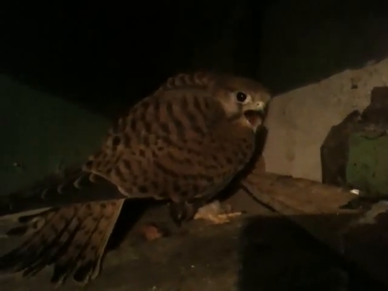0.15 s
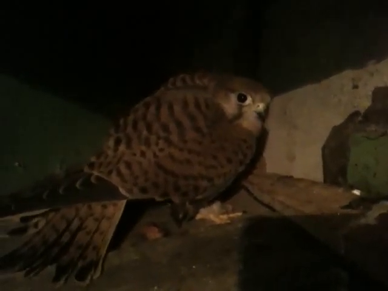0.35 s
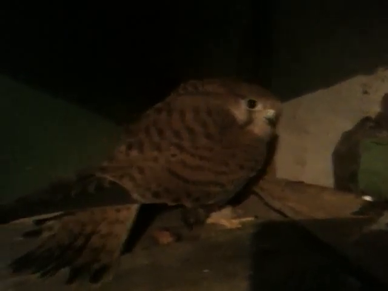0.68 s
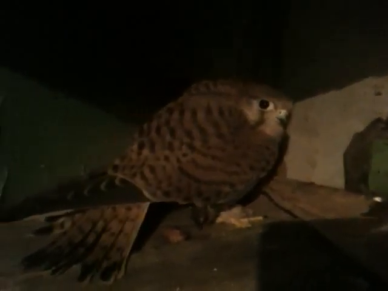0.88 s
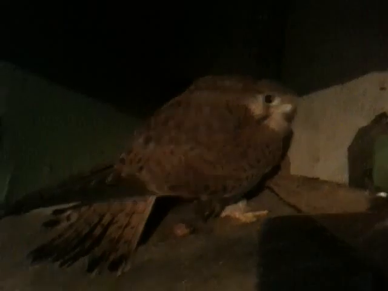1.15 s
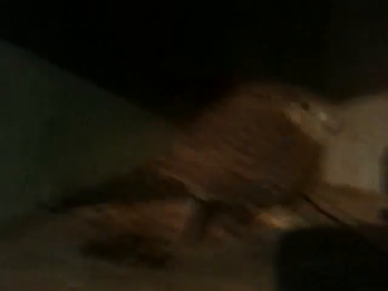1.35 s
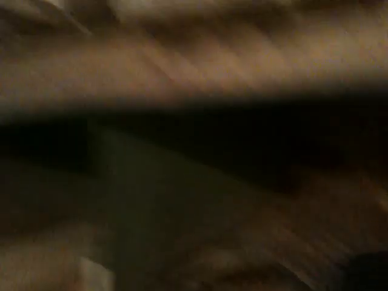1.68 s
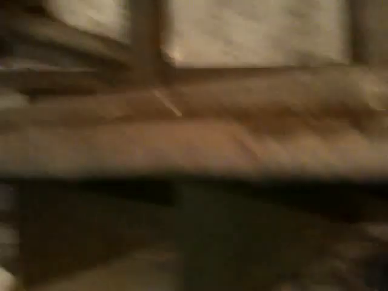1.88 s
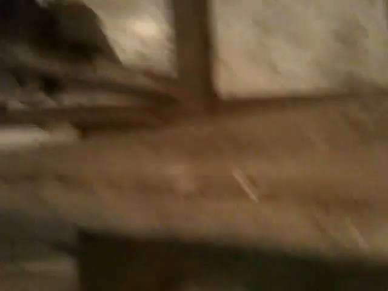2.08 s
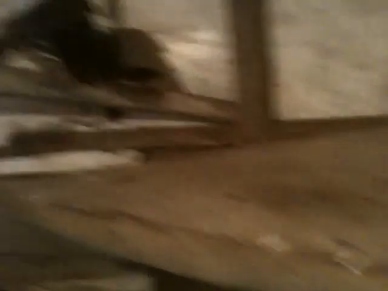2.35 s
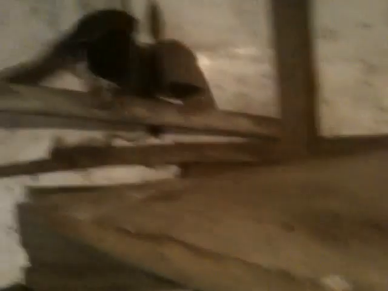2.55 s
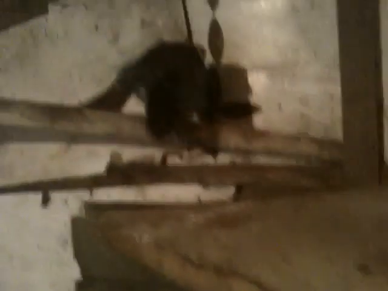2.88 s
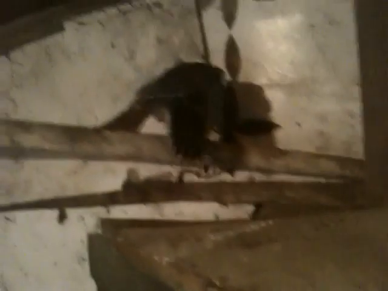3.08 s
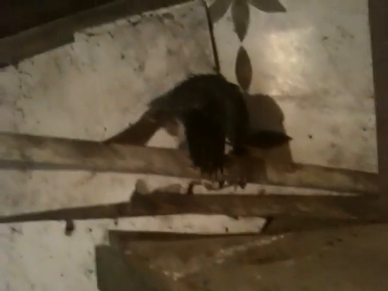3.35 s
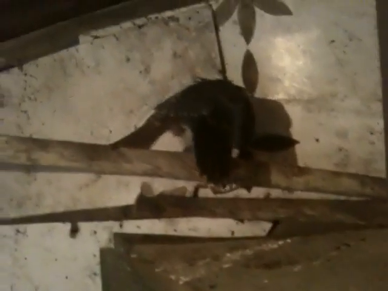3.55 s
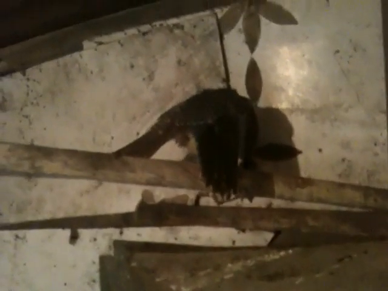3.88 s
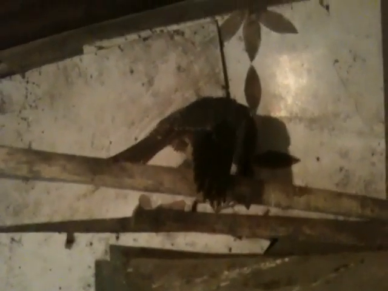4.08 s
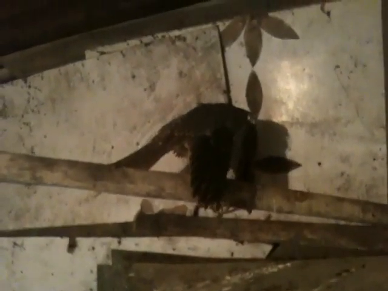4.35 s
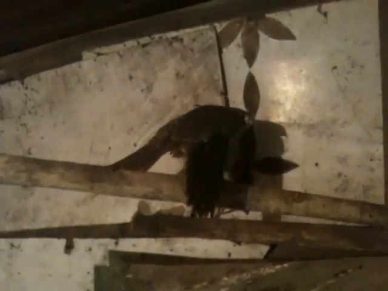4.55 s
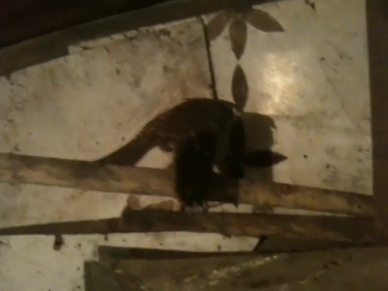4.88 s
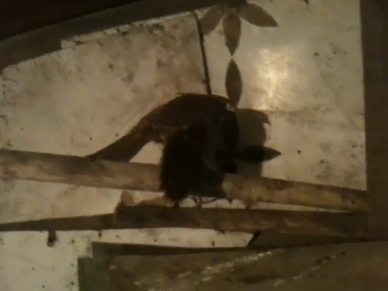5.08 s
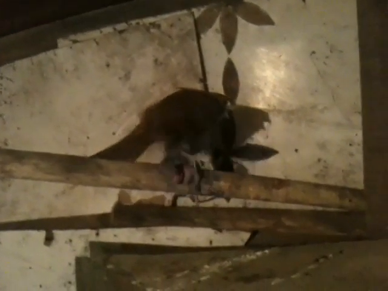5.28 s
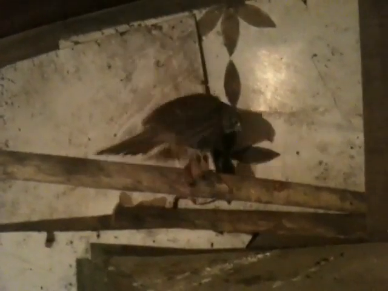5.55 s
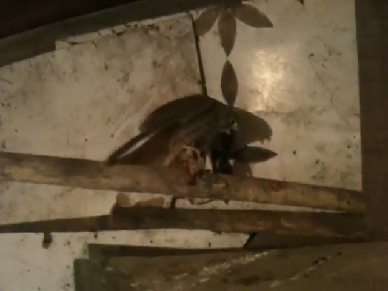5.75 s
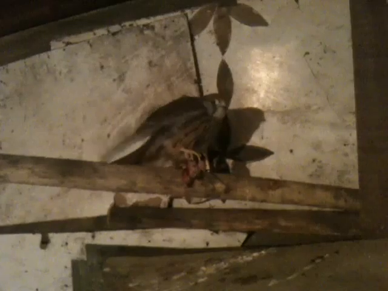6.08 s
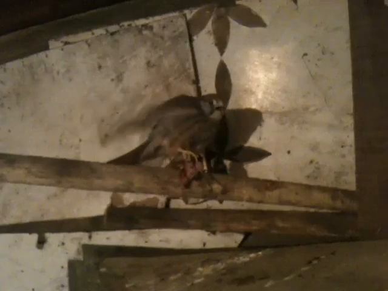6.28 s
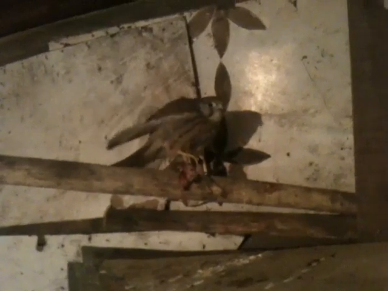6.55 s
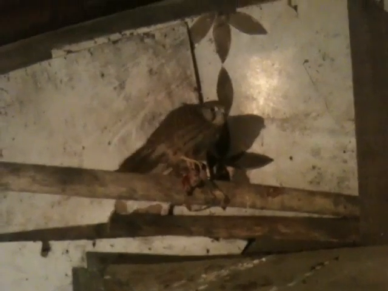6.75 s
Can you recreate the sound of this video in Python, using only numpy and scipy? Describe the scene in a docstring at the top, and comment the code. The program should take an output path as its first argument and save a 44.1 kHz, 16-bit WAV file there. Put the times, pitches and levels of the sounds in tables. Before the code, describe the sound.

Two small falcons call indoors at close range. The higher voice opens, overlapping a softer, lower one; the lower then keeps up a steady run of shrill, fast-throbbing trills, three of the early ones led by thin squeaks. The higher bird interrupts until the middle, then leaves the other alone. Tiny beak ticks, tight short reverberation, steady faint hiss and slight overload on the strongest notes.

```python
"""In a small wooden loft two kestrels call: trills whose pitch and strength throb fifteen times a second.
One on a perch calls over and over, three times after a thin squeak; a higher one, first close by, cuts in four times.
Each voice is a stack of harmonics with a resonant second, frayed by noise and heard straight and as echoes.
The loudest throbs overload the microphone. A few sharp ticks, hiss and faint far whistles lie beneath."""
import sys
import numpy as np
from scipy import signal
from scipy.fft import rfft, irfft, next_fast_len
from scipy.io import wavfile

SR = 44100
rng = np.random.default_rng(int(sys.argv[2]) if len(sys.argv) > 2 else 0)


def output_pcm(signal):
    """Save a mono or channel-first signal as 16-bit PCM at the path in sys.argv[1].

    Samples are clipped to [-1, 1] before scaling.
    """
    pcm = np.clip(np.atleast_2d(signal).T, -1, 1) * 32767
    wavfile.write(sys.argv[1], SR, np.round(pcm).astype(np.int16))


N = 304819

# Trills of each bird, one a row, before the straight and echo gains: (start [s], last crest [s], throb length [s],
# pitch at the last crest [Hz], climb to it [Hz], arch of pitch midway [Hz], level at the last crest [dB],
# swell to it [dB], arch of level midway [dB], ring of the second harmonic at the last crest [dB],
# pitch sag between crests [0-1])
PERCHED_TRILLS = [ (0.295, 0.533, 0.069, 1845, 79.3, -18.5, -18, 0.5, -0.1, -2, .09),
                  (0.677, 1.044, 0.065, 1892, 152.7, -14, -18, 6.5, 2.5, -2, 0.12),
                  (1.177, 1.545, 0.067, 1959, 196, 31.5, -16.5, 6.5, 3, 4.5, 0.14),
                  (1.712, 2.057, 0.064, 1979, 217, 11, -12.5, 10, 5.5, 1.5, 0.14),
                  (2.215, 2.509, 0.067, 1972, 226, 28.5, -10.5, 10.5, 0.5, 4.5, .12),
                  (2.670, 3.027, 0.063, 2042, 212.4, -4, -12.5, 9.5, 3, 7.5, 0.11),
                  (3.192, 3.498, 0.067, 1995, 221.5, 83.5, -10.5, 12, 5.5, 3.5, 0.09),
                  (3.643, 3.955, .065, 1997, 191.4, 23.5, -12, 7.5, 1, 6.5, .105),
                  (4.115, 4.413, .062, 1992, 109.7, 0.5, -11, 6.5, 0.5, 9, .105),
                  (4.63, 4.9, 0.064, 1962, 146.4, 29, -12.5, 5.5, 1, 6, .1),
                  (5.065, 5.424, 0.061, 2049, 153.6, 33, -13.5, 4.5, 4.5, 8.5, 0.07),
                  (5.708, 6.064, 0.067, 2030, 94.7, 83.5, -12.5, 4.5, 2.5, 3.5, .08),
                  (6.258, 6.554, 0.065, 2057, 164, 2.5, -11.5, 8, 2, 6, .1)]
HIGHER_TRILLS = [ (-.040, .266, .0665, 2256, 258.4, 65, -14.5, 1, 0.18, 17.5, 0.072),
                 (1.985, 2.213, .064, 2227, 34.5, -35, -17.5, 0, -1.8, 1.5, .085),
                 (2.550, 2.840, .063, 2318, 212.3, 50.5, -16.5, -0.5, -0.6, 5.4, 0.077),
                 (3.395, 3.630, .066, 2243, 65.2, 25, -14, 0.5, -0.38, 3.1, 0.071)]
# Harmonics of each voice, from the fundamental up: (level at a crest [dB], further level between crests [dB])
PERCHED_VOICE = [(-8, -10), (1, -10.5), (1.5, -7.5), (-5.5, -4), (-4.5, -10.5), (-13.5, -2.5),
                 (-13.5, -7.5), (-21.5, -1), (-17.5, -13.5)]
HIGHER_VOICE = [(1.5, -8), (0, -6), (1, -3.5), (-2, -5.5), (-8.5, 1), (-12.5, 2), (-11, -4), (-23.5, -5)]
# Thin squeaks with which the perched bird leads into a trill: (start [s], length [s], top pitch [Hz], level [dB])
SQUEAKS = [(0.676, 0.063, 3580, -21.5), (1.18, .045, 3530, -32), (1.684, 0.043, 3840, -24)]
# Strength of the straight path as the microphone is carried from one bird to the other:
# (time [s], perched level [dB], higher level [dB])
FACING = [(0, 3, -1.5), (.35, -5.5, 5.5), (1.5, -5.5, 3), (2.0, -3, 5.5), (2.5, .5, 2.5), (3.5, 0, -6),
          (6.9, -3.5, -7)]
# Sharp ticks, most as the beak opens for a trill: (time [s], level before the trim [dB])
TICKS = [(1.184, -26), (1.72, -10), (3.197, -19), (4.12, -21.5), (4.606, -20), (4.636, -30), (5.07, -19),
         (5.71, -24.5), (6.26, -20.5), (6.825, -49)]
# Faint gliding whistles: (start [s], end [s], first pitch [Hz], last pitch [Hz], arch midway [Hz], level [dB])
WHISTLES = [(0.552, 1.298, 1304, 1270, -19.5, -62), (1.701, 2.502, 1362, 1059, 40.5, -52),
            (4.2, 4.643, 1237, 1067, 89.5, -58.5), (5.446, 6.097, 1285, 1319, 47, -57.5),
            (6.391, 6.797, 975, 1130, 10, -61.5)]
# Relative spectra of air through the beak, the ticks, the steady hiss and the overload: (frequency [Hz], level [dB])
BREATH_COLOUR = [(1500, -22), (2700, 0.5), (3400, 13), (5500, 19), (7500, -34.5), (11000, -10),
                 (16000, -12)]
TICK_COLOUR = [(200, -73.5), (1500, 5.5), (2400, -6.5), (3200, 23), (5000, 10), (7500, 4), (12000, -2),
               (16000, -22)]
HISS_COLOUR = [(30, -63), (80, -32), (160, -14), (400, -9), (1200, -8.5), (2400, -12.5), (3500, -17.5),
               (5000, -4.5), (6700, 4), (8200, -7.5), (10000, -27), (16000, -27)]
CRACKLE_COLOUR = [(30, -20), (70, -19), (160, -30), (350, -7), (500, 14.5), (750, -33.5), (1300, -3),
                  (2800, 10.5), (8000, -17.5), (16000, -26)]
# Straight path; treble is beamed from the beak, so little of it goes this way: (frequency [Hz], gain [dB])
BEAM = [(2000, -3), (4200, 1), (6000, 0), (8000, -4.5), (12000, -6), (16000, -7)]
# Decay of the loft: (frequency [Hz], time to fall by 60 dB [s])
LOFT_DECAY = [(300, 0.17), (2000, 0.19), (4000, 0.2), (6000, 0.15), (10000, 0.14), (16000, 0.088)]

HISS_DB = -46  # rms
EDGE_HZ = 17000  # upper band limit
SLOW_START_S = 0.005  # the first crest is moved this much earlier, which lengthens the first throb
EARLIEST_S = 0.01  # least delay from the start to the first crest, before that move
FALL_S, FALL_SHARE, FALL_DB = 0.042, 0.1423, 10.5  # pitch and level drop after the last crest
UNEVEN_DB, UNEVEN_HZ = 0.5, 10  # random spread from crest to crest
RING_GROWTH_DB = 7  # growth of the ring from first crest to last
ATTACK_DB = 15.5  # rise of level into the first crest


def amp(db):
    """Converts a level in decibels to an amplitude ratio."""
    return 10 ** (np.asarray(db) / 20)


def unit(x):
    """Normalises a signal to rms 1."""
    return x / np.sqrt(np.mean(x ** 2) + 1e-20)


def read(points, hz):
    """Interpolates a spectrum linearly on a logarithmic frequency axis."""
    f, value = np.transpose(points)
    return np.interp(np.log(hz + 1), np.log(f), value)


def add(mix, start, sound):
    """Superposes a sound on the mix at a time in seconds, cut at both ends of the mix."""
    at = round(start * SR)
    sound = sound[max(-at, 0):]
    part = mix[max(at, 0):][:len(sound)]
    part += sound[:len(part)]


def coloured(x, colour):
    """Linear filtering: multiplies the spectrum of a signal by a gain curve."""
    size = next_fast_len(len(x))
    gain = amp(read(colour, np.fft.rfftfreq(size, 1 / SR)))
    return irfft(rfft(x, size) * gain, size)[:len(x)]


def noise(colour, size):
    """Gaussian noise shaped by a spectrum and normalised to rms 1."""
    return unit(coloured(rng.standard_normal(size), colour))


def wander(hz, size, order=5):
    """Low-passed noise: a random drift of rms 1, mostly slower than hz."""
    low_pass = signal.butter(order, hz, fs=SR, output="sos")
    return unit(signal.sosfilt(low_pass, rng.standard_normal(SR)))[-size:]


def hiss():
    """Stationary noise: a steady background of fixed spectrum and level."""
    return amp(HISS_DB) * noise(HISS_COLOUR, size=N)


def gesture(call):
    """Slow modulation: pitch and level climb from crest to crest, then fall."""
    start, last, throb_s, top_hz, climb_hz, arch_hz, top_db, swell_db, arch_db, ring_db, sag = call
    t = np.arange(start, last + FALL_S, 1 / SR)
    crests = np.arange(last, start + EARLIEST_S, -throb_s)[::-1].copy()
    crests[0] -= SLOW_START_S
    to_go = np.linspace(1, 0, len(crests))  # share of the trill still to come
    arch = np.sin(np.pi * to_go)
    chance = rng.standard_normal((len(crests), 2))
    crest_hz = top_hz - climb_hz * to_go + arch_hz * arch + UNEVEN_HZ * chance[:, 0]
    crest_db = top_db - swell_db * to_go + arch_db * arch + UNEVEN_DB * chance[:, 1]

    attack = np.interp(t, [start, crests[0]], [1, 0])
    release = np.clip((t - last) / FALL_S, 0, 1)
    throb = np.pi * np.interp(t, crests, np.arange(len(crests)))  # angle, a multiple of pi at each crest
    pitch = np.interp(t, crests, crest_hz) * (1 - FALL_SHARE * release ** 2)
    level_db = np.interp(t, crests, crest_db) - ATTACK_DB * attack - FALL_DB * release
    ring = np.interp(t, crests, ring_db - RING_GROWTH_DB * to_go)
    return t, throb, release, pitch, level_db, ring


def trill(call, voice, narrow, skew, lock, half, jitter, drift, rasp, air_db, strained_db,
          rasp_s=0.0632, jitter_hz=300, uneven=0.19, air_rise_db=3.0, air_hz=230, drain=0.28,
          scoop=0.14, scoop_s=0.014, chest_s=0.045, cling=0.11, shallow=0.2, purity=0.43,
          open_s=0.019, hoarse_db=-15, flicker_db=1.01, flicker_hz=110):
    """Harmonic synthesis: the syrinx sounds a harmonic stack that sags in pitch and strength between crests."""
    start, sag = call[0], call[-1]
    t, throb, release, pitch, level_db, ring_db = gesture(call)
    age = t - start

    throb = throb - skew * np.sin(throb) ** 2  # it tightens faster than it lets go
    slack = 1 - abs(np.cos(throb)) ** narrow  # 0 at a crest, 1 between
    strain = slack * (1 + cling * np.sin(2 * throb + np.pi))  # makes the ring come late and hang on
    ringing = 1 / (1 + abs(strain / lock) ** 5)  # the second harmonic snaps into the throat's resonance
    ring_db = ring_db * (1 - release ** 2)

    # the dips deepen through the call, no two alike
    depth = sag * (1 - shallow * (1 - age / age[-1]) + uneven * wander(12, len(t)))
    pitch = pitch * (1 - depth * slack)
    # pitch is roughest at the start, when slack and in the release
    unsteady = jitter * (1 + slack + release) + rasp * np.exp(-age / rasp_s)
    pitch = pitch * (1 + unsteady * wander(jitter_hz, len(t)) + drift * wander(86.7, len(t)))
    pitch = pitch * (1 - scoop * np.exp(-age / scoop_s))  # slides up into the note
    phase = 2 * np.pi * np.cumsum(pitch) / SR

    # the second harmonic speaks first, the fundamental last
    opening = 1 - np.exp(-(age / open_s) ** 2)
    chest = 1 - np.exp(-(age / chest_s) ** 2)
    # a partial at 3/2 of the pitch makes strong and weak cycles alternate
    out = half * amp(ring_db) * np.sin(3 * phase / 2)
    for k, (crest_db, slack_db) in enumerate(voice, 1):
        db = slack_db * slack
        swell = opening
        if k == 1:
            db = db - drain * ring_db  # a strong ring drains the fundamental
            swell = chest
        elif k == 2:
            db = ring_db * ringing + slack_db * (1 - ringing)
            swell = 1
        db = db + flicker_db * (k - 1) * wander(flicker_hz, len(t))  # harmonics above the first flicker
        out += swell * amp(crest_db + db) * np.sin(k * phase)
        # turbulence frays each line, more so for high harmonics
        blur = wander(air_hz, len(t)) * np.cos(k * phase) + wander(air_hz, len(t)) * np.sin(k * phase)
        out += swell * amp(crest_db + air_db + air_rise_db * k) * blur

    # air escapes wherever the tone is loose, least in a ringing call
    breath = amp(hoarse_db) * opening * np.exp(-age / rasp_s) + amp(strained_db) * (slack + release)
    out += breath * amp(-purity * ring_db) * noise(BREATH_COLOUR, size=len(t))
    edges = np.clip(age / 0.019, 0, 1) * np.clip((t[-1] - t) / 0.00072, 0, 1)
    return start, out * edges * amp(level_db)


def bird(calls, voice, **manner):
    """Superposition: all the trills of one bird share a voice and a manner."""
    out = np.zeros(N)
    for call in calls:
        add(out, *trill(call, voice, **manner))
    return out


def loft(x, gap_s=0.0017, build_s=0.0015):
    """Reverberation: dense echoes from the boards, each frequency band decaying at its own rate."""
    hz, t, bands = signal.stft(rng.standard_normal(SR // 2), SR, nperseg=256)
    decay = amp(-60 * t / read(LOFT_DECAY, hz)[:, None])
    tail = signal.istft(bands * decay, SR, nperseg=256)[1]
    tail = tail * np.clip((np.arange(len(tail)) / SR - gap_s) / build_s, 0, 1)
    return signal.fftconvolve(x, tail / np.linalg.norm(tail))[:N]


def whistles(waver=0.0093, ends_db=-7):
    """Frequency modulation: a thin far tone glides and wavers, loudest midway."""
    out = np.zeros(N)
    for start, end, first_hz, last_hz, arch_hz, db in WHISTLES:
        u = np.linspace(0, 1, round((end - start) * SR))
        arch = np.sin(np.pi * u)
        glide = first_hz + (last_hz - first_hz) * u + arch_hz * arch
        pitch = glide * (1 + waver * wander(40, len(u)))
        tone = np.sin(2 * np.pi * np.cumsum(pitch) / SR)
        add(out, start, amp(db + ends_db * (1 - arch)) * tone * signal.windows.tukey(len(u), 0.2))
    return out


def squeaks(dip=0.131, rough=0.014, rough_hz=300):
    """Frequency modulation: one wavering partial arches up and down in pitch and strength."""
    out = np.zeros(N)
    for start, length, top_hz, db in SQUEAKS:
        arch = np.sin(np.linspace(0, np.pi, round(length * SR))).clip(0) ** 0.5
        pitch = top_hz * (1 - dip * (1 - arch) + rough * wander(rough_hz, len(arch)))
        add(out, start, amp(db) * arch * np.sin(2 * np.pi * np.cumsum(pitch) / SR))
    return out


def ticks(rise_s=0.00086, decay_s=0.0049, trim_db=-3):
    """Transients: short dry snaps of noise with a fast rise and an exponential decay."""
    out = np.zeros(N)
    t = np.arange(2048) / SR
    envelope = (1 - np.exp(-t / rise_s)) * np.exp(-t / decay_s)
    for start, db in TICKS:
        add(out, start, amp(db + trim_db) * noise(TICK_COLOUR, size=2048) * envelope)
    return out


def scene(perched_room_db=-7, higher_room_db=-8, tick_room_db=-2):
    """Direct and reverberant fields: each bird is heard straight and by way of the loft, over a hiss."""
    time, perched_db, higher_db = np.transpose(FACING)
    t = np.arange(N) / SR
    higher = bird(HIGHER_TRILLS, HIGHER_VOICE, narrow=4.2, skew=0.22, lock=0.39, half=0.035,
                  jitter=0.004, drift=0.007, rasp=0.0152, air_db=-29, strained_db=-14.5)
    perched = bird(PERCHED_TRILLS, PERCHED_VOICE, narrow=2.1, skew=0.22, lock=0.35, half=0,
                   jitter=0.00257, drift=0.008, rasp=0.028, air_db=-37, strained_db=-29.5)
    perched = perched + squeaks()
    snaps = ticks()
    straight = perched * amp(np.interp(t, time, perched_db)) + higher * amp(np.interp(t, time, higher_db))
    echoes = amp(perched_room_db) * loft(perched) + amp(higher_room_db) * loft(higher)
    small = snaps + amp(tick_room_db) * loft(snaps) + loft(whistles())  # whistles come only as echoes
    return (coloured(straight, BEAM) + echoes + small + hiss())[None]


def record(dry, ceiling=0.98, lopsided=0.03, crackle=0.12):
    """Nonlinear distortion: overloaded peaks flatten, with a soft thump and a crackle; then a band limit."""
    clipped = dry / (1 + (dry / ceiling) ** 10) ** (1 / 10)
    excess = np.clip(abs(dry) - 1, 0, 1)  # beyond full scale
    clipped = clipped + excess * (lopsided + crackle * noise(CRACKLE_COLOUR, size=N))
    low_pass = signal.firwin(511, EDGE_HZ, window=("kaiser", 9), fs=SR)
    return signal.oaconvolve(clipped, low_pass[None], "same")


dry = scene()
out = record(dry)
output_pcm(out)
```